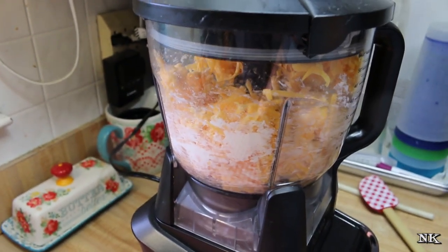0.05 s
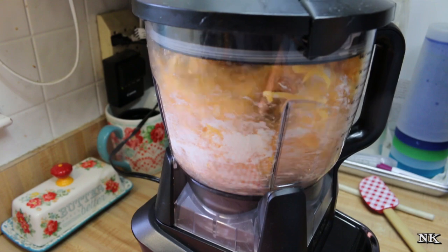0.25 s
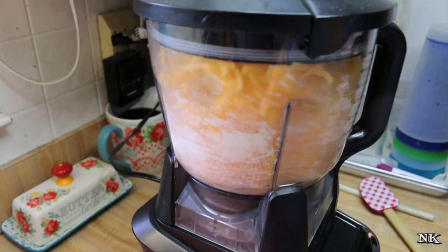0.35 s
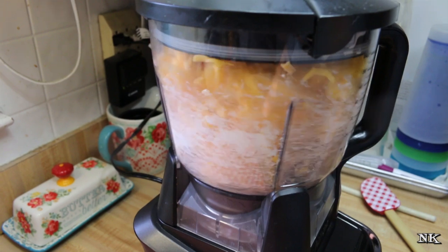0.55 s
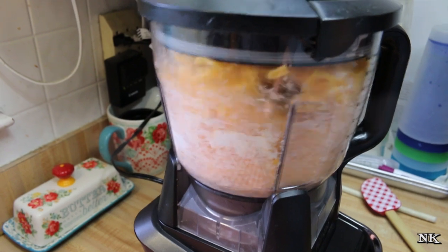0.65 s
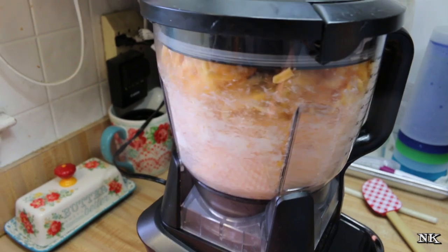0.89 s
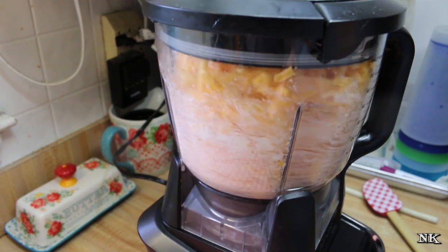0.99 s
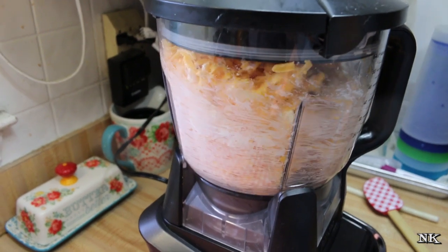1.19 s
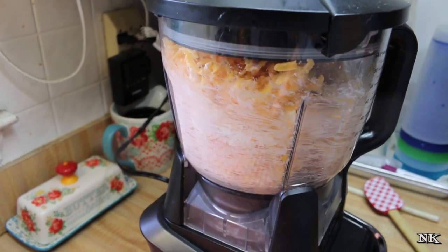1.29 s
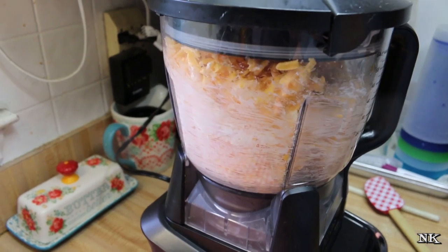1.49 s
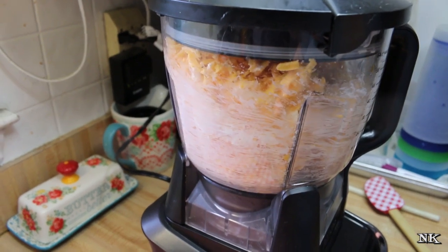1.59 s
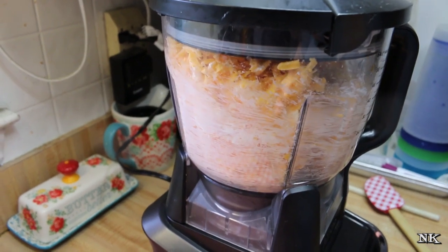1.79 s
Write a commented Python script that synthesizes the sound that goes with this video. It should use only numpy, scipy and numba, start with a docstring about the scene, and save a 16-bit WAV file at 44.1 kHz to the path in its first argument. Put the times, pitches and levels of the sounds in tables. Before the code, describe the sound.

A food processor pulses once in a kitchen, its rough whine surging up, then winding down

```python
"""Kitchen counter: a food processor is pulsed once over a fan-like room noise.
The switch closes and mains current buzzes in the windings: harmonics of twice the mains frequency.
Gear and fan whines, speed-locked tones, climb, hold and run down through the housing's resonances.
Churn, rattle, air and sizzle are shaped noises; lumps of cheese thump the bowl as filtered noise swells.
A gain control ducks the loud passage and recovers."""
import sys
import numpy as np
from scipy import signal
from scipy.fft import rfft, irfft, next_fast_len
from scipy.io import wavfile
from scipy.ndimage import uniform_filter1d
from numba import njit

SR = 44100
rng = np.random.default_rng(int(sys.argv[2]) if len(sys.argv) > 2 else 0)


def amplitude_ratio(level_db):
    """Convert a level in decibels to the matching linear amplitude (field) ratio."""
    exponent = np.asarray(level_db, float) / 20
    return 10 ** exponent


def master(y):
    """Save y as 16-bit WAV."""
    cut = np.clip(np.atleast_2d(y).T, -1, 1)
    pcm = np.round(cut * 32767)  # scale
    wavfile.write(sys.argv[1], SR, pcm.astype(np.int16))


N = 81585

# Room noise spectrum: freq_hz, relative_density_db
ROOM_SPECTRUM = [(12, -25), (22, -1.5), (68, -2.5), (122, -16.5), (157, -5), (186, -26), (220, -2),
                 (275, -19), (363, -7.5), (429, -22), (470, -16), (800, -20.5), (1250, -15.5),
                 (2000, -20.5), (2600, -26.5), (3600, -26), (5500, -33.5), (7000, -42), (10000, -46),
                 (15600, -49.5)]
# Motor run-up and coast-down: time_s, gear_mesh_hz, whine_level_db (before the housing)
MOTOR_SPEED = [(.245, 950, -31.5), (.275, 1220, -23), (.297, 1400, -18), (.32, 1600, -19.5),
               (.345, 1810, -14.5), (.385, 2090, -17), (.43, 2230, -19), (.5, 2430, -20.5),
               (.62, 2640, -17.5), (.73, 2690, -23), (.765, 2600, -17), (.8, 2350, -19), (.835, 2090, -21),
               (.875, 1870, -15), (.912, 1620, -16.5), (.955, 1400, -18), (.99, 1310, -26),
               (1.09, 1030, -21), (1.18, 770, -38), (1.28, 480, -38.5)]
# Motor noise levels: time_s, bowl_churn_db, gear_rattle_db, cooling_air_db, brush_sizzle_db
RUSH_LEVELS = [(.245, -18.5, -22.5, -35, -44), (.28, -14, -16.5, -28.5, -39),
               (.34, -13.5, -17, -22.5, -35.5), (.45, -17.5, -16.5, -24, -32.5),
               (.6, -17, -15.5, -22, -29.5), (.78, -17, -15.5, -20.5, -32.5), (.88, -19, -16, -22.5, -33.5),
               (.96, -17.5, -17.5, -28, -40), (1.05, -21.5, -23, -31, -45), (1.13, -25, -25.5, -38.5, -51),
               (1.2, -24.5, -36.5, -51, -74), (1.27, -32.5, -52, -68, -80), (1.33, -37, -38, -51, -82)]
# Shaft, gear and fan tones: multiple_of_mesh, powered_db, coasting_db, smear_hz, powered_clean_share
WHINE_TONES = [(.094, -11, -24, 25, .6), (.325, -10, -28, 20, .85), (.66, -6.5, -26, 60, .6),
               (1, -2.5, -3, 110, .6), (1.25, -12, -18, 200, .1), (1.32, -7, -16, 130, .4),
               (2, -17, -22, 200, .2)]
# Housing and bowl resonances: freq_hz, width_hz, peak_gain_db
BODY_MODES = [(248.5, 38, 6.5), (644, 21, 5), (757, 43, 5.5), (863, 10, 6), (1386, 98, 6.5),
              (1547, 69, 2.5), (1970, 70, 2.5), (2141, 80, 4), (2760, 67, 2), (3260, 120, 2.5),
              (5180, 300, 1.5)]
# Low churn in the bowl, spectrum: freq_hz, relative_density_db
CHURN_SPECTRUM = [(30, -29), (70, -8.5), (130, -4), (240, -0.5), (400, -7), (650, -0.5), (1000, -11.5),
                  (1600, -36), (3000, -70)]
# Gear rattle, spectrum: freq_hz, relative_density_db
RATTLE_SPECTRUM = [(300, -64), (600, -20), (1000, -2.5), (1500, 0.5), (2200, -3.5), (3300, -7.5),
                   (5000, -24.5), (9000, -70)]
# Cooling air, spectrum: freq_hz, relative_density_db
AIR_SPECTRUM = [(1200, -60), (2200, -27), (3500, 2.5), (4500, -6), (5300, -2), (7000, -12), (10000, -29),
                (16000, -70)]
# Brush sizzle, spectrum: freq_hz, relative_density_db
SIZZLE_SPECTRUM = [(3000, -60), (5500, -9.5), (8000, 1), (10000, 0), (13000, -7), (15700, -15.5),
                   (20000, -50)]
# Magnetic buzz harmonics: multiple_of_buzz, inrush_db, running_db
BUZZ_HARMONICS = [(1, -1, -9), (2, 0, 0), (3, 0, -10), (4, -2, -10), (5, -6, -12), (6, -12, -18),
                  (8, -13, -20), (10, -15, -22)]
# Lumps on the bowl wall: start_s, level_db, length_s
LUMP_THUMPS = [(0.354, -15.5, 0.062), (.43, -10.5, 0.036), (0.478, -11.5, 0.048), (.61, -12, 0.031),
               (0.659, -15.5, 0.053), (0.758, -14.5, .05), (0.829, -12, 0.053), (0.889, -15.5, 0.051)]
# Small hard ticks: start_s, level_db, centre_hz
CRUMB_TICKS = [(.2435, -30, 7000), (.335, -37, 11000), (.482, -33, 11500), (.885, -37, 12000),
               (.999, -38, 12000), (1.063, -37, 11500), (1.127, -46, 11500)]

ROOM_DB = -35
ON_S, OFF_S, SWITCH_S = 0.2425, 0.748, 0.03  # OFF_S: middle of the opening ramp
BUZZ_HZ = 120.1  # twice the mains
INRUSH_DB, INRUSH_S, RUN_DB = -9.5, 0.043, -16.5
RISE_S, EASE_S = 0.012, 0.32  # the hum fades as the motor gains speed
COAST_CLEAN = 0.6  # unloaded gears chatter: less of the clean core stays
BLADE_PER_MESH, BLADE_DEPTH = 0.0215, 0.074
THUMP_HZ, THUMP_WIDTH_HZ, TICK_FALL_S = 700, 380, 0.0024
KITCHEN_T60_S, KITCHEN_DB = 0.3, -10
AGC_TOP_DB, AGC_RATIO, AGC_ATTACK_S = -33, 1.401, 0.024
AGC_OVERSHOOT_RELEASE_DB_PER_S = 31  # before the ratio is applied


def unit(x):
    """Scale to rms 1."""
    return x / np.sqrt(np.mean(x ** 2))


def curve(table, column):
    """Column of a time table, one value per sample."""
    rows = np.array(table)
    return np.interp(np.arange(N) / SR, rows[:, 0], rows[:, column])


def walk(rate_hz):
    """Random levels held 1 / rate_hz s and slewed; spread near 1."""
    hold = int(SR / rate_hz)
    steps = np.repeat(rng.standard_normal(N // hold + 1), hold)
    return 1.29 * uniform_filter1d(uniform_filter1d(steps, hold), hold)[:N]


def band(x, hz, width_hz):
    """Resonance, gain 1 at the centre."""
    return signal.lfilter(*signal.iirpeak(min(hz, 0.45 * SR), hz / width_hz, SR), x)


def noise(spectrum, flicker_db, rate_hz):
    """Coloured noise, rms 1, whose overlapping half-octave bands each flicker."""
    points = np.array(spectrum)
    size = next_fast_len(N)
    log_f = np.log(np.arange(size // 2 + 1) * SR / size + 1)
    gain_db = np.interp(log_f, np.log(points[:, 0]), points[:, 1])
    spec = rfft(rng.standard_normal(size)) * amplitude_ratio(gain_db)
    step = np.log(2) / 2
    total = 0
    for centre in np.arange(2.7, 10.4, step):  # natural log of Hz
        triangle = np.clip(1 - abs(log_f - centre) / step, 0, 1)
        part = irfft(spec * triangle, size)[:N]
        total = total + part * amplitude_ratio(flicker_db * walk(rate_hz))
    return unit(total)


def gate(start_s, rise_s, fall_s):
    """Quick exponential rise, exponential fall."""
    t = np.maximum(np.arange(N) / SR - start_s, 0)
    return (1 - np.exp(-t / rise_s)) * np.exp(-t / fall_s)


def power():
    """1 until the switch opens, then a short ramp to 0."""
    return np.clip((OFF_S - np.arange(N) / SR) / SWITCH_S + 0.5, 0, 1)


def room():
    """Steady fan-like noise with slowly flickering bands."""
    return amplitude_ratio(ROOM_DB) * noise(ROOM_SPECTRUM, 1.73, 11.73)


def kitchen(x):
    """Tiles and counter throw back a short, dense echo: decaying noise as impulse response."""
    t = np.arange(int(0.5 * SR)) / SR
    decay = np.exp(-np.log(1000) * t / KITCHEN_T60_S)
    tail = rng.standard_normal(len(t)) * decay * (t > 0.003)
    tail = tail / np.sqrt(np.sum(tail ** 2))
    return x + amplitude_ratio(KITCHEN_DB) * signal.fftconvolve(x, tail)[:N]


def body(x):
    """Housing and bowl ring along: resonances added to the direct sound."""
    return x + sum((amplitude_ratio(db) - 1) * band(x, hz, width_hz) for hz, width_hz, db in BODY_MODES)


def ticks():
    """Crumbs tick on the plastic: short bursts of high band noise."""
    source = rng.standard_normal(N)
    out = 0
    for start_s, db, hz in CRUMB_TICKS:
        click = unit(band(band(source, hz, 0.6 * hz), hz, 0.6 * hz))
        out = out + amplitude_ratio(db) * gate(start_s, 0.0005, TICK_FALL_S) * click
    return out


def thumps():
    """Lumps thump the bowl wall: half-sine swells of band noise through the body."""
    t = np.arange(N) / SR
    swell = 0
    for start_s, db, length_s in LUMP_THUMPS:
        swell = swell + amplitude_ratio(db) * np.sin(np.pi * np.clip((t - start_s) / length_s, 0, 1))
    dull = band(rng.standard_normal(N), THUMP_HZ, THUMP_WIDTH_HZ)
    dull = band(dull, THUMP_HZ, THUMP_WIDTH_HZ)
    return unit(body(dull)) * swell


def buzz():
    """Magnetic buzz: a brief inrush over an easing hum, harmonics flickering in level and phase."""
    t = np.arange(N) / SR - ON_S
    flat_then_drop = np.exp(-(np.maximum(t, 0) / INRUSH_S) ** 4)
    inrush = amplitude_ratio(INRUSH_DB) * flat_then_drop * gate(ON_S, RISE_S, 9e9)
    run = amplitude_ratio(RUN_DB) * gate(ON_S, RISE_S, EASE_S)
    out = 0
    for k, inrush_db, run_db in BUZZ_HARMONICS:
        level = (amplitude_ratio(inrush_db) * inrush + amplitude_ratio(run_db) * run) * amplitude_ratio(4.3 * walk(60.37))
        phase = 2 * np.pi * (k * BUZZ_HZ * t + rng.random()) + 0.52 * walk(60)
        out = out + level * np.sin(phase)
    return power() * out


def rush(turns):
    """Churn, rattle, cooling air and brush sizzle: noises pulsing slightly at the blade rate."""
    blade = 1 + BLADE_DEPTH * np.cos(2 * np.pi * BLADE_PER_MESH * turns)
    slosh = noise(CHURN_SPECTRUM, 1.5, 25)
    churn = unit(slosh + 0.24 * body(slosh)) * amplitude_ratio(curve(RUSH_LEVELS, 1))
    rattle = unit(body(noise(RATTLE_SPECTRUM, 0.74, 24.6))) * amplitude_ratio(curve(RUSH_LEVELS, 2))
    air = unit(body(noise(AIR_SPECTRUM, 0.78, 21.1))) * amplitude_ratio(curve(RUSH_LEVELS, 3))
    sizzle = noise(SIZZLE_SPECTRUM, 0.78, 20.2) * amplitude_ratio(curve(RUSH_LEVELS, 4) + 1.2 * walk(27.5))
    return blade * (churn + rattle + air + sizzle)


def whines(turns):
    """Shaft, gear and fan tones locked to the speed: a clean core in a rough, smeared skirt."""
    out, on = 0, power()
    for multiple, on_db, off_db, smear_hz, clean in WHINE_TONES:
        rough = (walk(2 * smear_hz) + 1j * walk(2 * smear_hz)) / np.sqrt(2)
        core = clean * (COAST_CLEAN + (1 - COAST_CLEAN) * on)
        carrier = np.exp(2j * np.pi * multiple * turns)
        tone = (core + np.sqrt(1 - core ** 2) * rough) * carrier
        level_db = off_db + (on_db - off_db) * on + 1.15 * walk(25.53)
        out = out + amplitude_ratio(level_db) * tone.real
    return np.sqrt(2) * out * amplitude_ratio(curve(MOTOR_SPEED, 2))


def motor():
    """Whines through the body twice, plus the rush; starts at the switch and fades out at the end."""
    turns = np.cumsum(curve(MOTOR_SPEED, 1)) / SR  # gear mesh cycles
    end = np.clip((1.34 - np.arange(N) / SR) / 0.15, 0, 1)
    return gate(ON_S, 0.002, 9e9) * end * (body(body(whines(turns))) + rush(turns))


def scene():
    """Food processor with its kitchen echo, over the room noise."""
    processor = motor() + buzz() + thumps() + ticks()
    return (kitchen(processor) + room())[None]


@njit
def follow(x, attack, release):
    """Level follower in dB: fast up, at most a steady slope down."""
    e, out = 0., np.empty(len(x))
    for i in range(len(x)):
        if x[i] > e:
            e = e + (x[i] - e) * attack
        else:
            e = max(x[i], e - release)
        out[i] = e
    return out


def gain_control(dry):
    """Turns loud passages down and lets go slowly."""
    level = np.sqrt(uniform_filter1d(dry[0] ** 2, size=441) + 1e-12)  # 10 ms rms
    over_db = np.maximum(20 * np.log10(level) - AGC_TOP_DB, 0)
    held_db = follow(over_db, 1 / (AGC_ATTACK_S * SR), AGC_OVERSHOOT_RELEASE_DB_PER_S / SR)
    duck_db = held_db * (1 - 1 / max(AGC_RATIO, 1))
    return dry * amplitude_ratio(-duck_db)


def roll_off(x):
    """The treble ends steeply here."""
    return signal.sosfilt(signal.butter(12, 15790, fs=SR, output="sos"), x)


def record(dry):
    """Gain control first, then the last stage."""
    mix = gain_control(dry)
    return roll_off(mix)


dry = scene()
out = record(dry)
master(out)
```